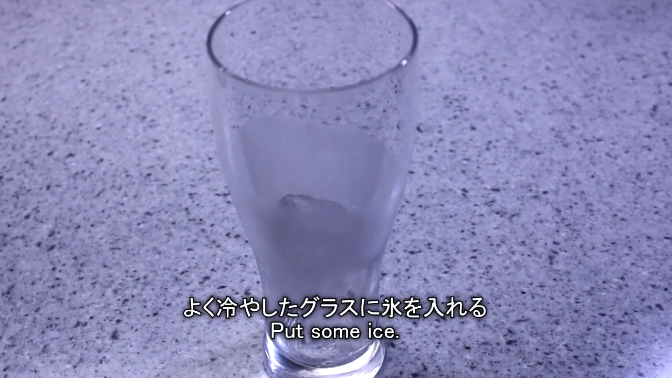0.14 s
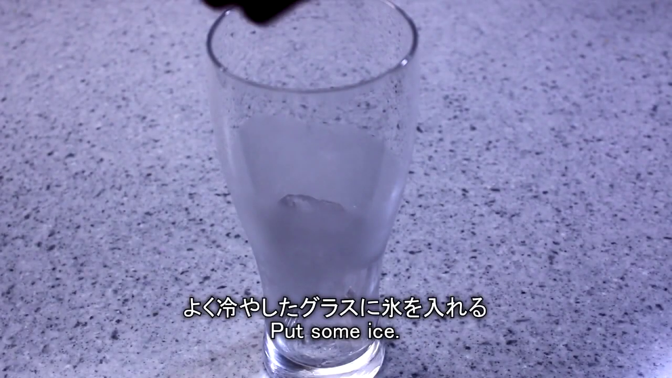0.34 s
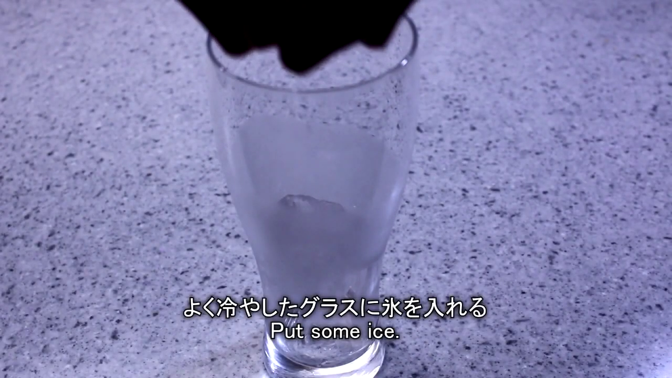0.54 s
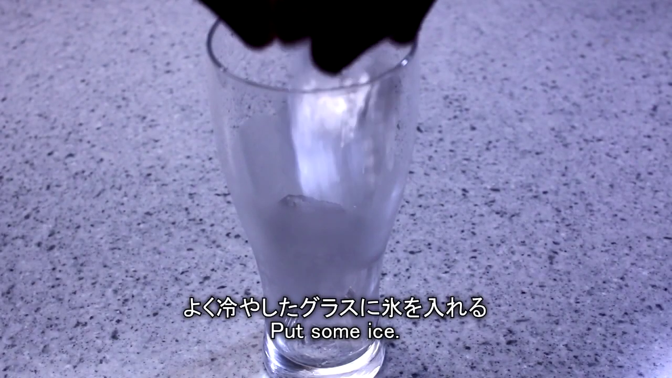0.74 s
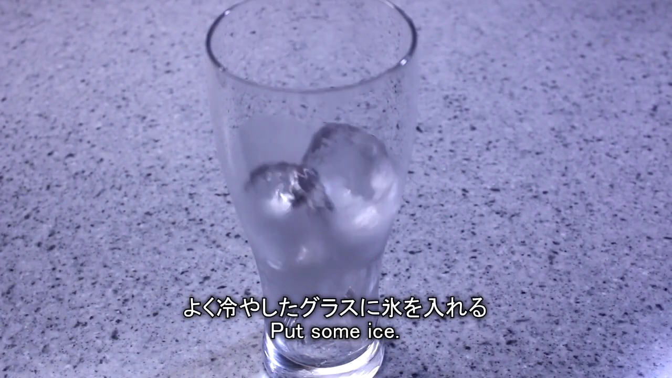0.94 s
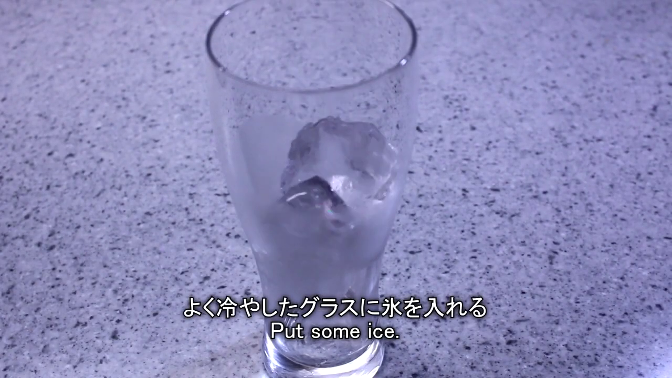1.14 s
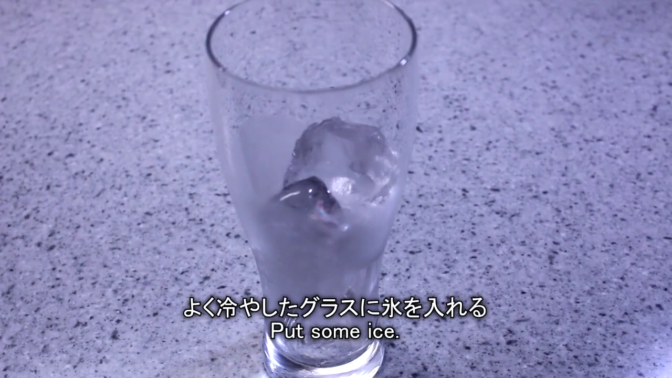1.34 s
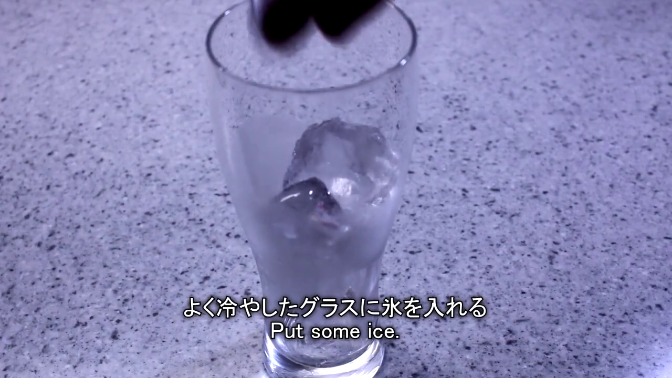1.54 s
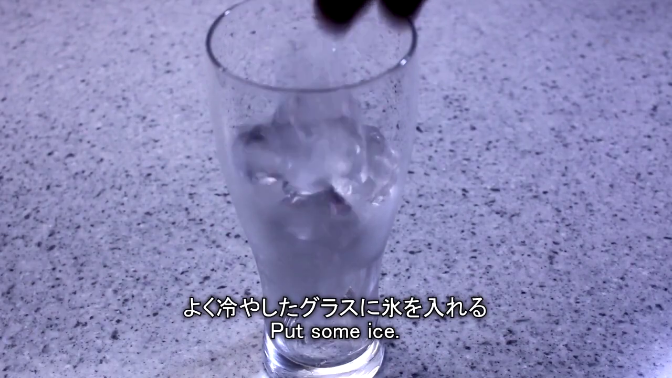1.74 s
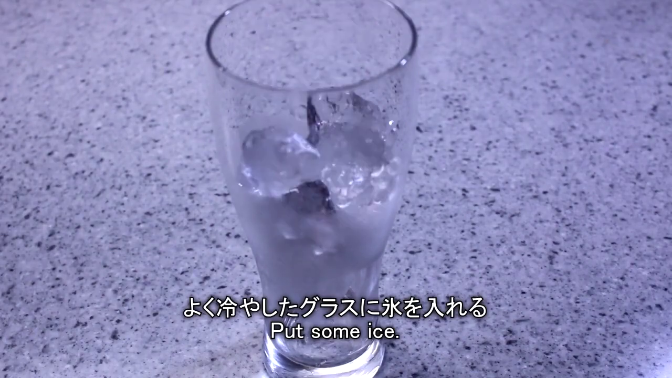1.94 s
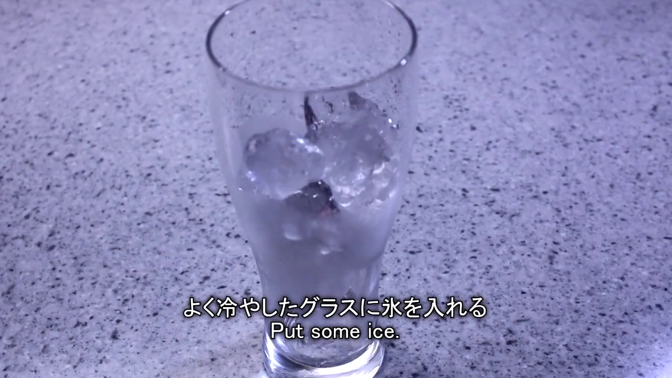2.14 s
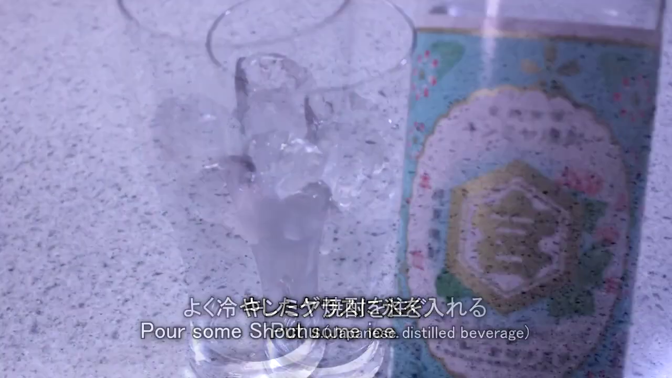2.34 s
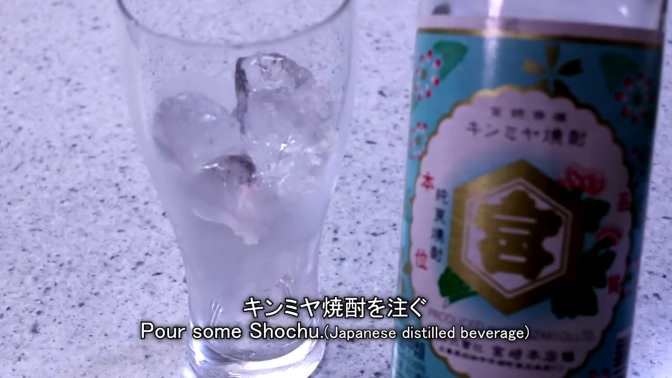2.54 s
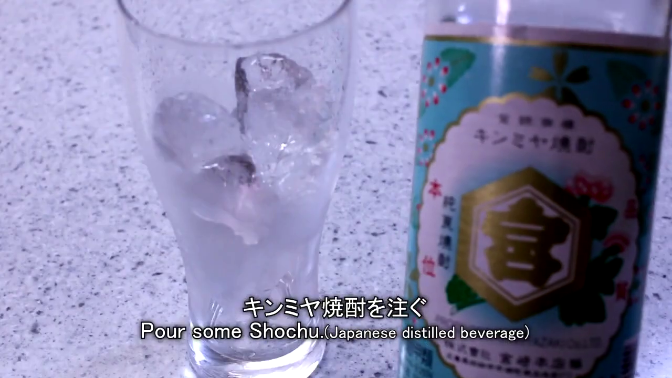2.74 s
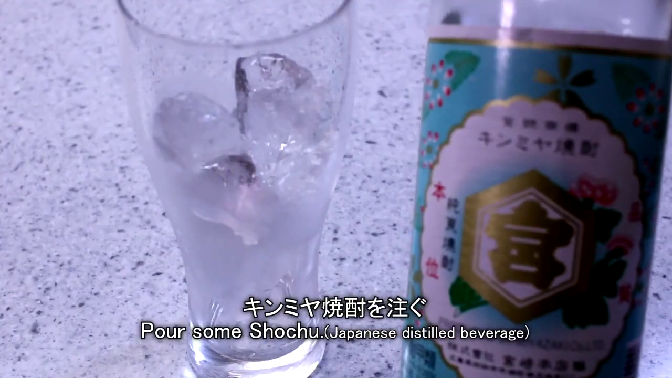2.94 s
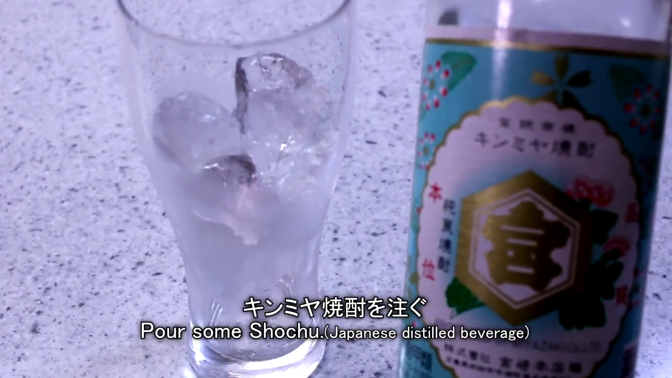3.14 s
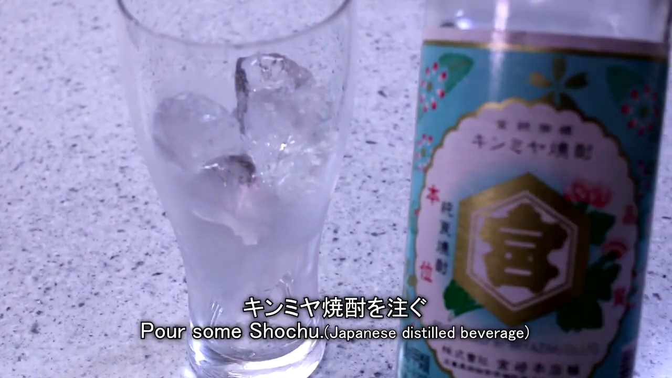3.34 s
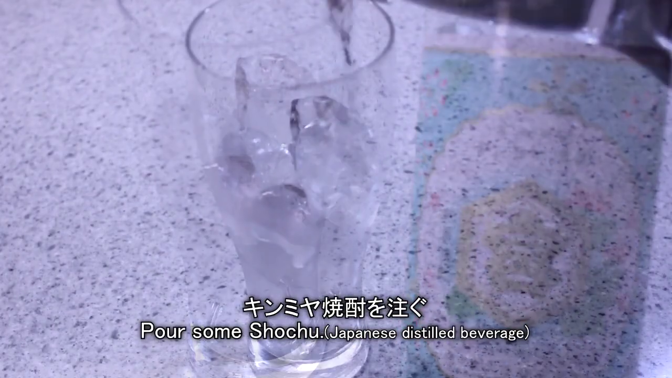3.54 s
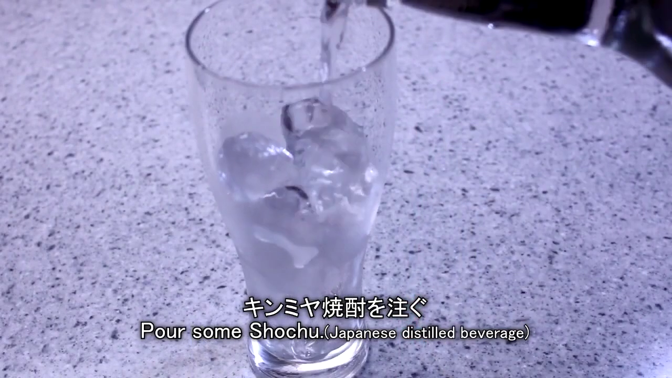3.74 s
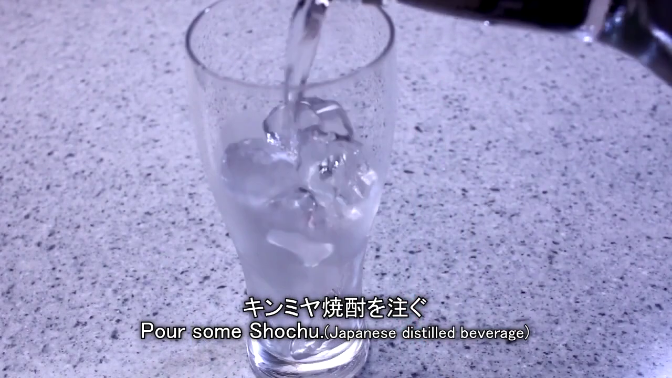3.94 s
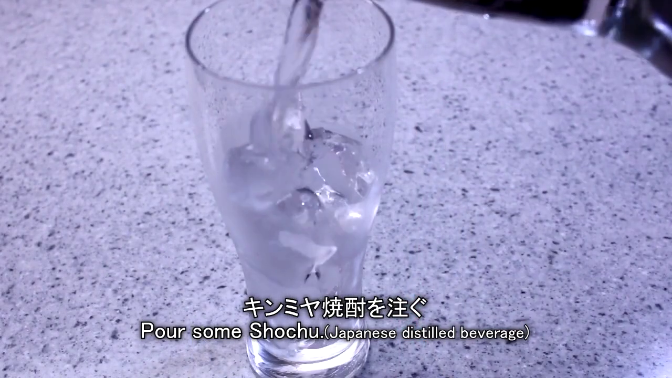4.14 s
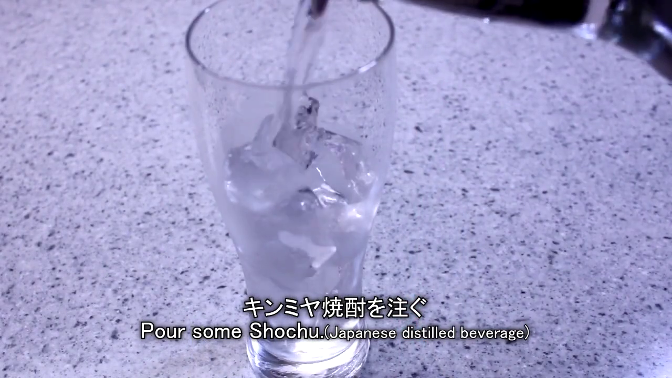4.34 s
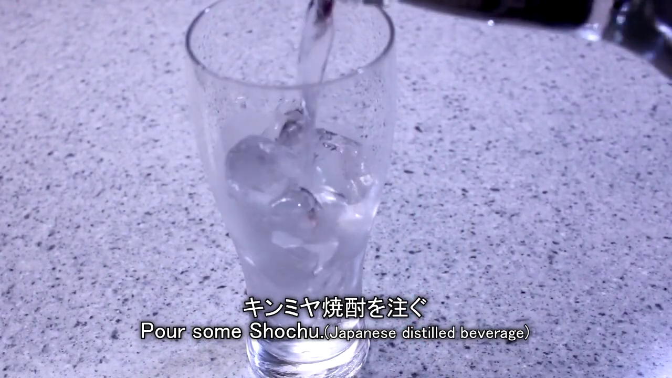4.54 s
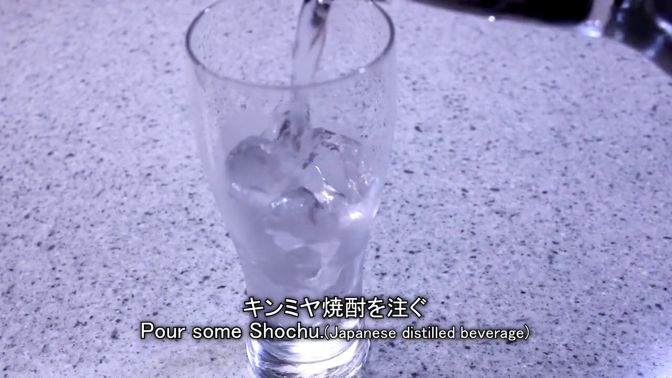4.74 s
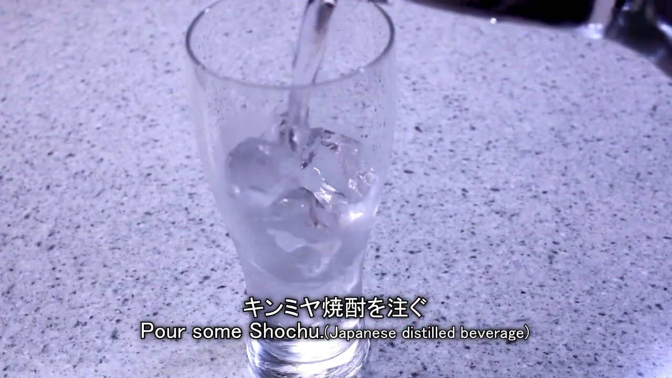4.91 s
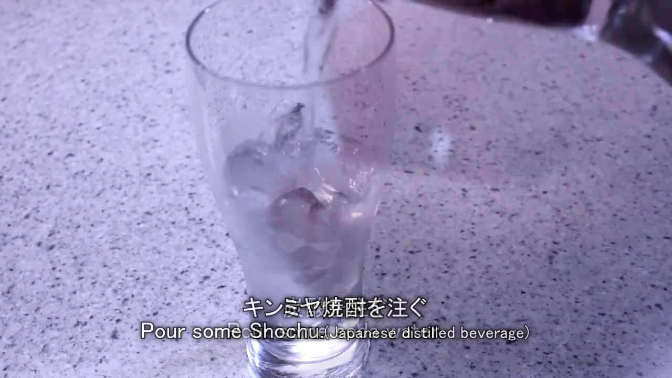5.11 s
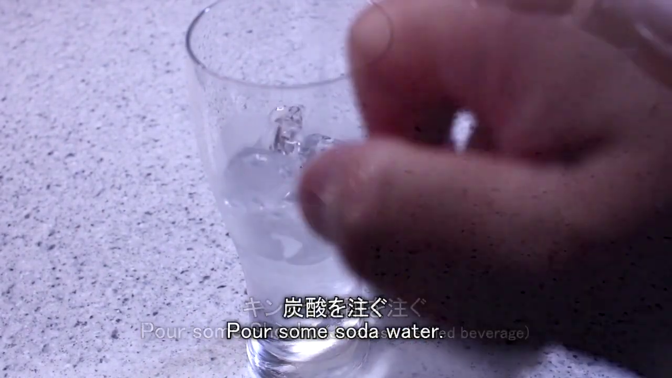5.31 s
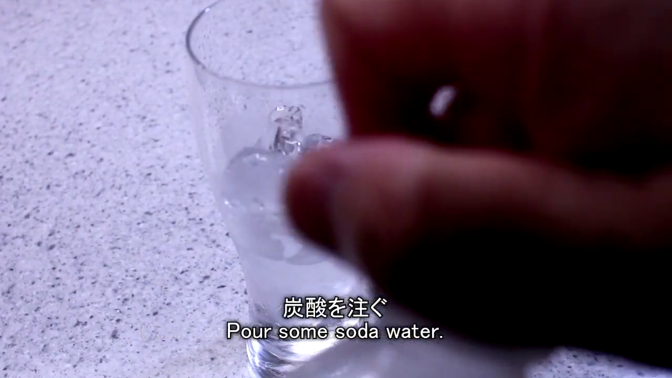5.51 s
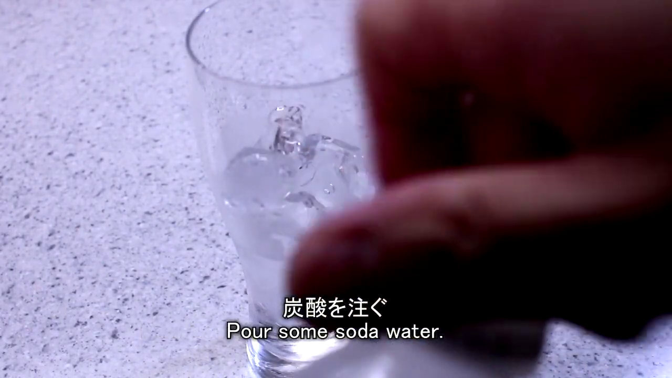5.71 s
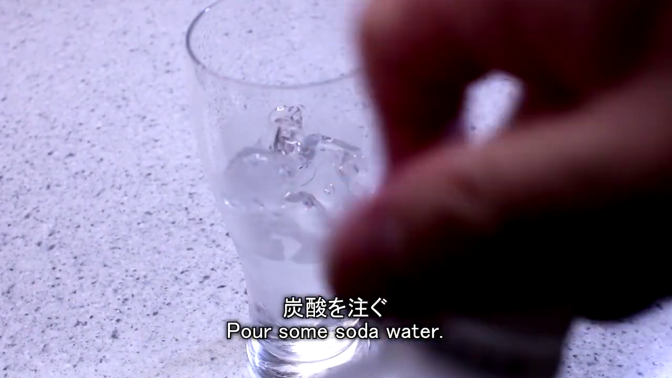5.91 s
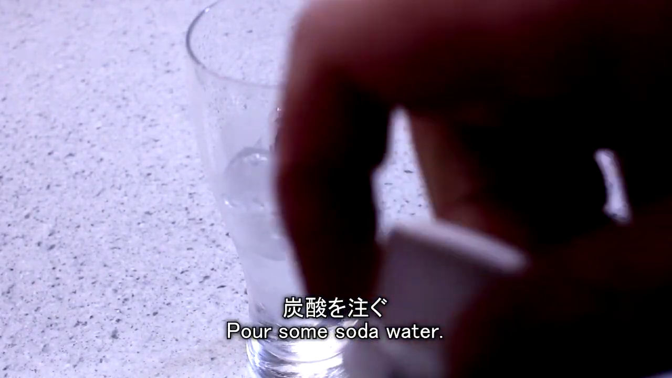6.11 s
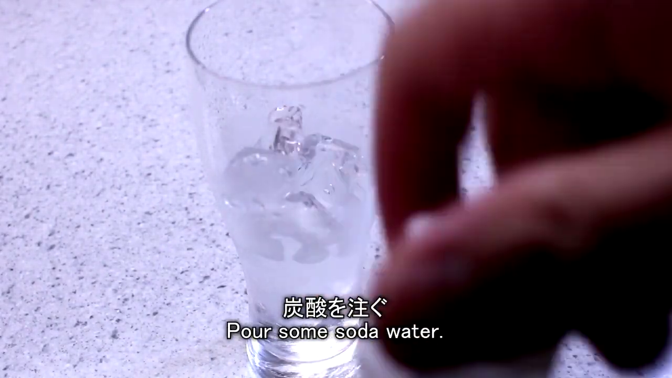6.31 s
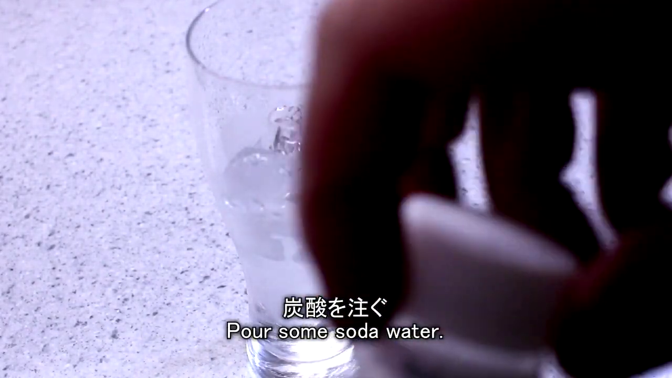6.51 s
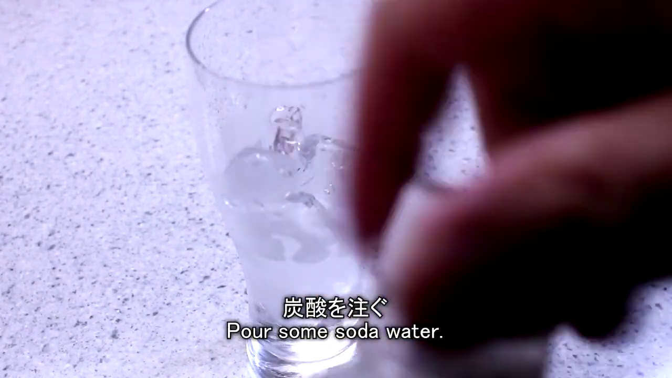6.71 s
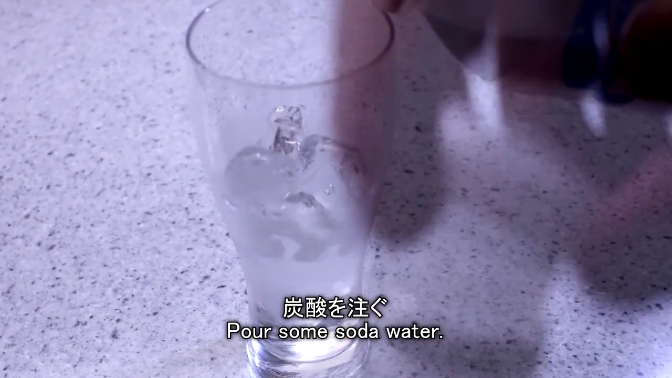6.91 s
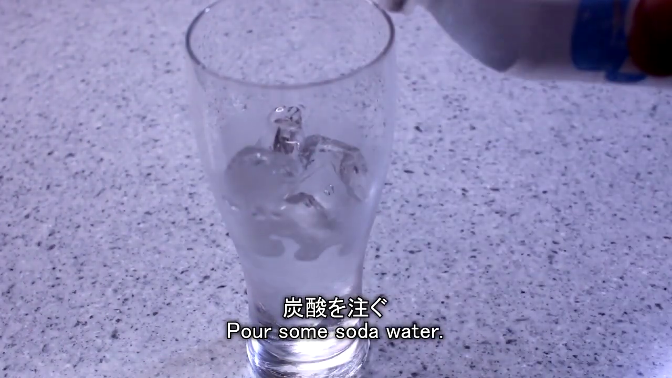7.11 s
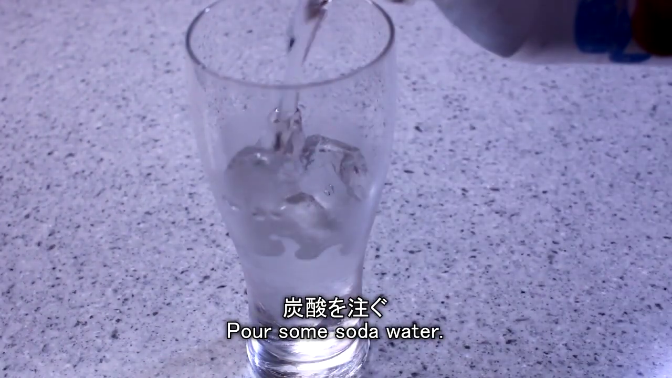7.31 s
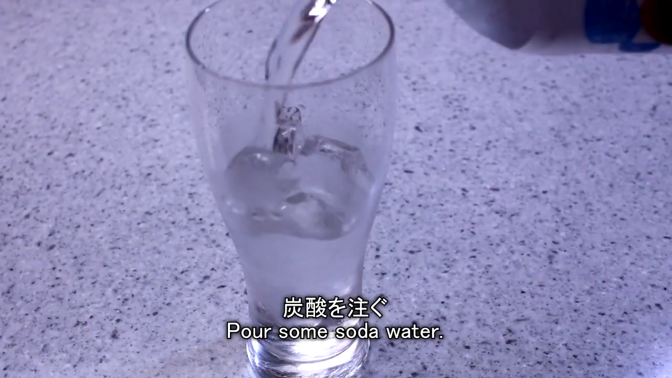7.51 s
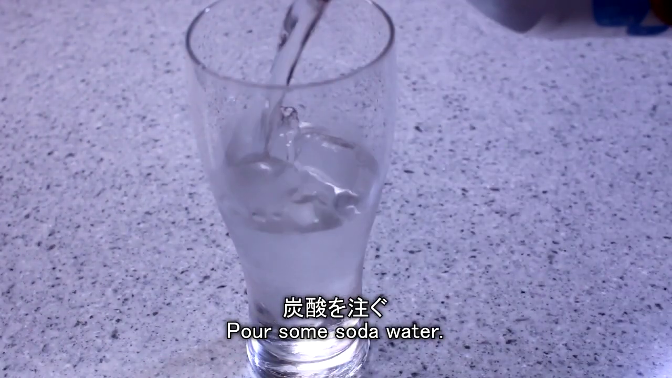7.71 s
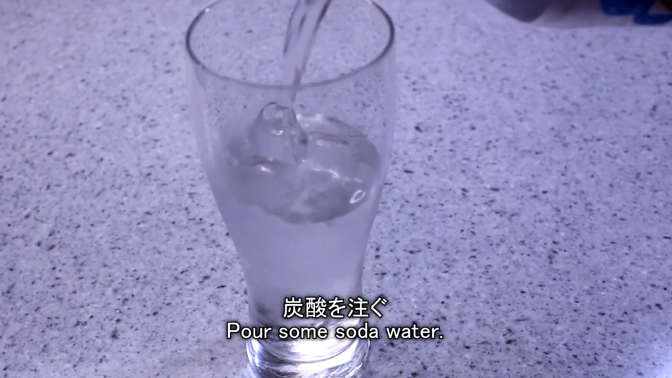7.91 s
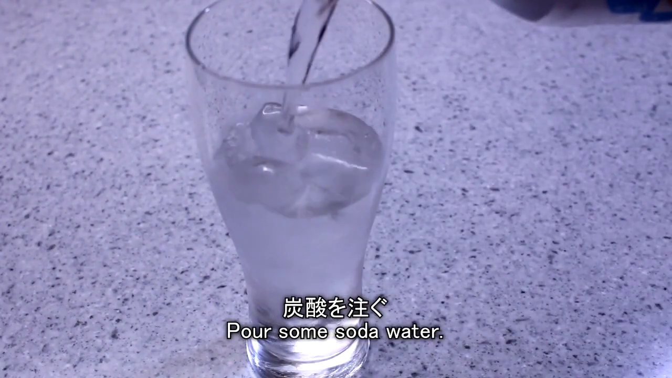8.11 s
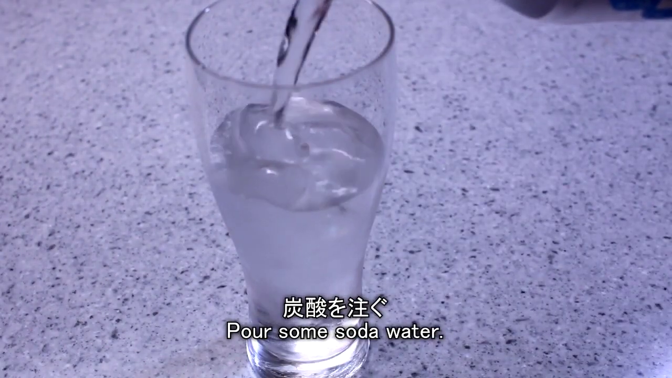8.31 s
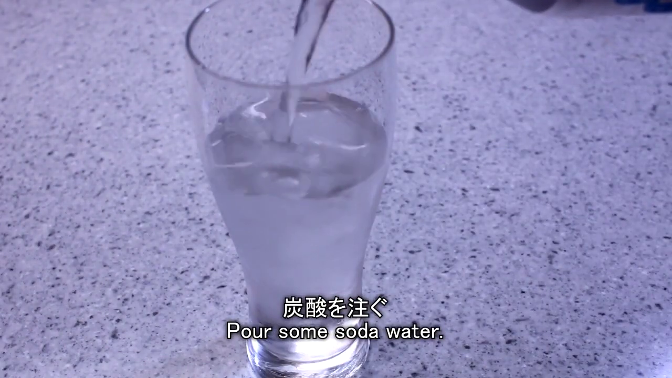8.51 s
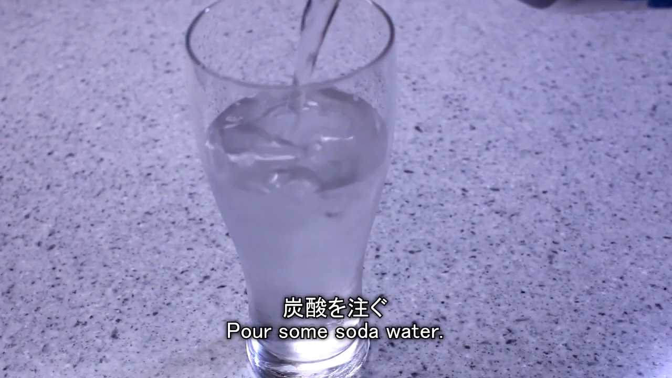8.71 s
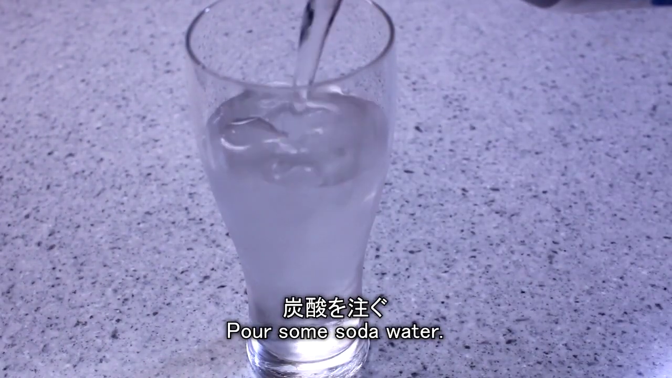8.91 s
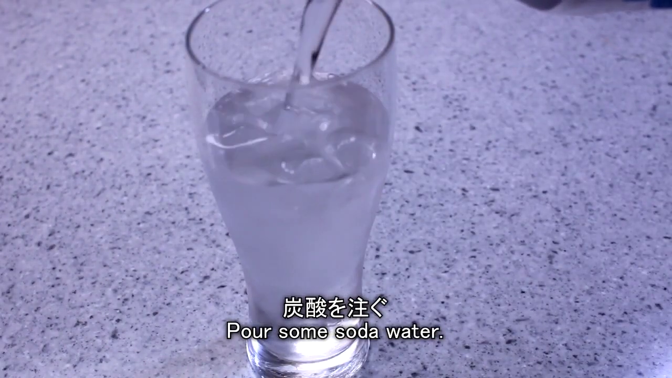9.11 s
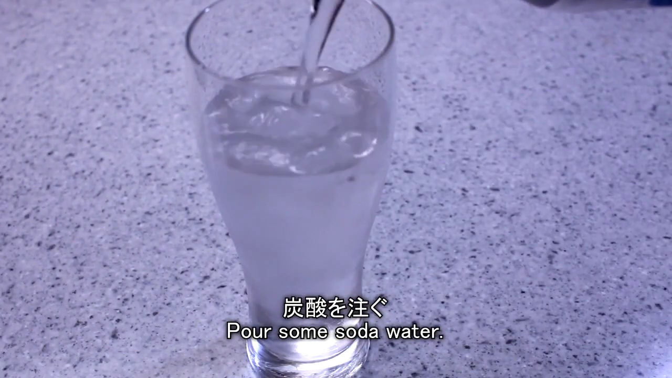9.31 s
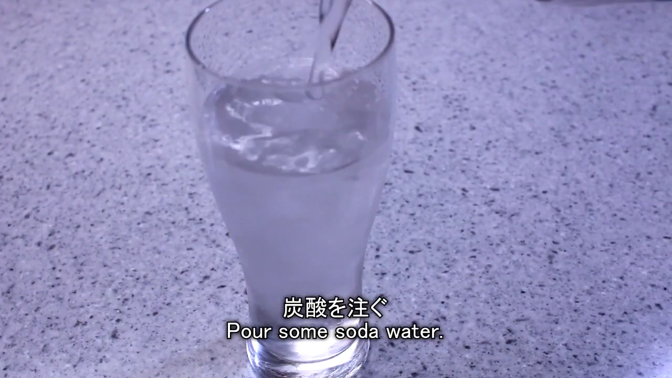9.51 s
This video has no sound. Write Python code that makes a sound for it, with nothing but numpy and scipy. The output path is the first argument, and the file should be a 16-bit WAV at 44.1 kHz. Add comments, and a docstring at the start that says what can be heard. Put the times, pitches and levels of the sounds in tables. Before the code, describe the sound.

A drink is made close to the microphone on a kitchen counter. Cubes rattle briefly, then hit an empty glass with loud bright clinks, each ring choked by the next cube. A stream of liquid splashes over them, glugging while ice shifts. A soda cap is twisted off with rough clicks and a short sharp hiss. Soda follows, its bubbles deepening as cubes tap softly, with short room reverberation.

```python
"""Ice cubes rattle, then drop into a tall dry glass whose wall modes ring in pairs and are choked by later cubes.
A spirit is poured, as chirping bubbles over grainy splash, and the cubes knock and shift as short resonant bursts.
A plastic cap is twisted off a soda bottle: resonant clicks, thread rub, rough spits and a burst of gas in shaped noise.
Soda fills the glass, the floating cubes tapping its wall.
A small hard-walled kitchen, a decaying noise tail, hums quietly behind in shaped noise."""
import sys
import numpy as np
from scipy import signal
from scipy.io import wavfile

SR = 44100
rng = np.random.default_rng(int(sys.argv[2]) if len(sys.argv) > 2 else 0)


def unload_wav(signal):
    """Save mono or channel-first audio to the path in sys.argv[1] as 16-bit WAV at rate SR, clipped to [-1, 1]."""
    wavfile.write(
        sys.argv[1],
        SR,
        np.round(np.clip(np.atleast_2d(signal).T, -1, 1) * 32767).astype(np.int16),
    )


def voltage_ratio(decibels):
    """Convert decibels (scalar or array-like) to amplitude ratios, 20 dB per decade."""
    exponent = np.asarray(decibels, float) / 20
    return 10 ** exponent


N = 421155   # length [samples]

# cubes hitting the dry glass, levels relative: (time [s], crack level [dB], first ring level [dB],
# second ring level [dB], upper rings level [dB], share of the older ringing that survives the contact)
CUBE_LANDINGS = [(.733, 4.5, -12, -11.5, -27, 1), (0.776, -15.5, -23, -31, -19, 0.2),
                 (0.785, 6.5, -23, -30, -16, 0.084), (.814, -1, -9.5, -6.5, -24, 0.05),
                 (.849, -11, -39.5, -38, -24, .6), (1.034, -33, -46, -50, -58, 0.45),
                 (1.103, -24, -58.5, -57, -70, 0.25), (1.707, -24, -19, -37, -24.5, 0.66),
                 (1.734, 6, -26, -34.5, -21, .5), (1.745, 4, -20.5, -27.5, -20.5, 0.17),
                 (1.864, -2, -23.5, -34, -22.5, 0.4), (1.956, -11, -27, -27.5, -45.5, 0.5),
                 (1.968, -9.5, -33, -39, -37, 0.5), (2.43, -24, -59, -69, -75, 0.89),
                 (2.439, -26, -64.5, -69, -77, 0.79), (2.45, -40, -66, -71.5, -81, .93)]
# modes of the glass: (pitch [Hz], level [dB], t60 [s], split up to the twin [Hz], waves round the rim)
GLASS_MODES = [(1434, 0, .45, 7.4, 2), (2945, 0, .5, 4.6, 3), (668, -4, .07, 40, 1), (1190, -8, .08, 30, 1),
               (2290, -14, .15, 30, 2), (3198, -8, .3, 10, 3), (3390, -8, .15, 30, 2),
               (4030, -18, .1, 60, 3), (5437, -4, .3, 45, 3), (5580, 0, .35, 60, 3), (5790, -6, .25, 40, 2),
               (6293, -10, .15, 50, 3), (7316, -7, .35, 60, 2), (7450, -4, .35, 50, 3),
               (7700, -10, .3, 60, 3), (9050, -12, .27, 90, 3), (10700, -12, .3, 90, 2),
               (12150, -15, .28, 90, 3), (13260, -19, .35, 60, 2)]
HALF_OCTAVE_EDGES_HZ = 25 * 2 ** np.arange(0, 9.6, .5)


def at_hz(points, hz):
    """A spectrum read on a log-frequency axis."""
    points = np.array(points, float)
    return np.interp(np.log(hz), np.log(np.maximum(points[:, 0], 1)), points[:, 1])


def rms_one(x):
    """Scaled to unit rms."""
    return x / np.sqrt(np.mean(x ** 2) + 1e-20)


def band(x, low_hz, high_hz):
    """Second-order band-pass."""
    return signal.sosfilt(signal.butter(2, [low_hz, min(high_hz, .45 * SR)], "band", fs=SR, output="sos"), x)


def ring(clicks, hz, t60):
    """A two-pole resonator: a unit click sets a sine of height 1 ringing."""
    r, w = voltage_ratio(-60 / (t60 * SR)), 2 * np.pi * hz / SR
    return signal.lfilter([0, np.sin(w)], [1, -2 * r * np.cos(w), r * r], clicks + 1e-18)


def add(out, s, sound):
    """Lay a sound into out from time s."""
    i = max(round(s * SR), 0)
    out[..., i:i + sound.shape[-1]] += sound[..., :N - i]


def ramp_db(start, stop, rise, fall):
    """0 dB from start to stop, sloping away before and after (dB per s)."""
    s = np.arange(N) / SR
    return np.minimum(0, np.minimum(rise * (s - start), fall * (stop - s)))


def shaped_noise(level_db, alike, start, stop):
    """Half-octave bands of stereo noise; level_db(hz) is the level over time, alike(hz) the left-right likeness."""
    a, b = round(start * SR), min(round(stop * SR), N)
    out = np.zeros((2, N))
    white = rng.standard_normal((2, 2, b - a), dtype=np.float32)
    for k, (low, high) in enumerate(zip(HALF_OCTAVE_EDGES_HZ, HALF_OCTAVE_EDGES_HZ[1:])):
        mid, side = band(white[k % 2], low, high)   # neighbouring bands use different noise
        hz = np.sqrt(low * high)
        c = np.clip(alike(hz), -1, 1)
        gain = voltage_ratio(level_db(hz)[a:b])
        out[:, a:b] += gain * (np.sqrt(1 + c) * mid + np.sqrt(1 - c) * side * [[1], [-1]])
    return out


def scattered(start, stop, per_s, db, low_hz, high_hz):
    """Rows of small knocks at random times, strengths round db and pitches."""
    when, octave, keep, size = rng.random((100, 4)).T
    times = start + when * (stop - start)
    levels = db - 3 * np.log(-np.log(size + 1e-9) + .1)   # a few are much louder
    pitches = low_hz * (high_hz / low_hz) ** octave
    rows = np.c_[times, levels, pitches]
    return list(rows[keep * 100 < per_s * (stop - start)])


def knocks(rows, body, body_db, own_db, thud_db, snap_db, smear_db, t60, snap_t60):
    """Each knock: a short ring and a ragged burst round its own pitch, the body, a low thud, a bright snap."""
    out, thuds, snaps = np.zeros((3, N)) + 1e-12
    t = np.arange(SR // 9) / SR
    for s, db, hz in rows:
        noise = rng.standard_normal((3, len(t)))
        spread = rng.normal(0, 4, len(body))   # each knock excites the body differently [dB]
        blow = noise[0] * voltage_ratio(-60 * t / 0.012) / 3   # a ragged contact of a few ms
        blow[0] = 1.3   # after one clean edge
        sound = voltage_ratio(own_db) * ring(blow, hz, t60)
        for (peak_hz, width, peak_db), extra_db in zip(body, spread):
            sound += voltage_ratio(body_db + peak_db + extra_db) * ring(blow, peak_hz, 5.2 / width)
        # sharp edge, then a smear, more after hard knocks
        edge = voltage_ratio(-60 * t / 0.0063)
        fall = edge + voltage_ratio(smear_db + 0.13 * (db + 15) - 60 * t / snap_t60)
        burst = band(band(noise[0], .6 * hz, 1.7 * hz), .5 * hz, 2 * hz)
        sound += voltage_ratio(8.0) * burst * fall
        sound *= voltage_ratio(db) / np.abs(sound).max()
        # high knocks come from small contacts: less thud, more snap
        octaves = np.log2(hz / 2000)
        add(thuds, s, voltage_ratio(db + thud_db - 1.5 * octaves - 60 * t / 0.054) * noise[1])
        hardness_db = 0.88 * (db + 21.0)   # harder knocks are brighter
        add(snaps, s, voltage_ratio(db + snap_db + octaves + hardness_db) * noise[2] * fall)
        add(out, s, sound)
    return band(out + band(thuds, 150, 960) + band(snaps, 5500, 10000), 180, 16000)


def background():
    """Rumble, appliance hum and microphone hiss: steady shaped noise, swelling together."""
    # spectrum before the offsets below: (pitch [Hz], relative level [dB])
    quiet = [(15, -40), (25, -17.5), (65, -1.5), (118, -5.5), (214, 1.5), (273, -1), (509, -7.5), (765, -7),
             (1000, -9), (1390, -17), (1640, -16), (1820, -17.5), (14000, -31), (15200, -38.5)]
    # how alike the two sides are: (pitch [Hz], left-right likeness)
    likeness = [(60, 1), (130, 0.55), (290, 1), (640, -0.18), (1410, 0.59), (3100, -0.24), (6820, 0.085),
                (15000, 0.17)]
    # the background is fuller: (from [s], to [s])
    swells = [(2.28, 3.55), (6.82, 9.9)]
    s = np.arange(N) / SR
    fade_s = 0.099
    swell = sum(np.clip(np.minimum(s - a, b - s) / fade_s + .5, 0, 1) for a, b in swells)

    def level(hz):
        if hz < 95:
            offset_db = -45 + 9 * swell   # rumble
        elif hz < 1200:
            offset_db = -39.5 + 3.5 * swell   # hum
        else:
            offset_db = -35 + 1.5 * swell   # hiss
        return at_hz(quiet, hz) + offset_db

    return shaped_noise(level, lambda hz: at_hz(likeness, hz), 0, N / SR)


def ice_rattle():
    """Loose cubes rattle: loud knocks with small random ones between, exciting the tray's resonances."""
    # loud knocks: (time [s], level [dB], main pitch [Hz])
    loud_knocks = [(.026, -47, 4000), (.033, -26, 2220), (.043, -26, 1440), (.056, -29, 2270),
                   (.066, -22, 1080), (.077, -32, 4100), (.091, -23, 4150), (.128, -32, 4600),
                   (.130, -38, 6900), (.149, -17.5, 4000), (.189, -27, 3950), (.251, -36, 2470)]
    # tray resonances, t60 being 5.2 / width: (pitch [Hz], width [Hz], relative level [dB])
    tray = [(2400, 270, -5.5), (4110, 430, 5.5), (4320, 230, -5)]
    small = scattered(.028, .22, per_s=200, db=-36, low_hz=900, high_hz=4500)
    return knocks(loud_knocks + small, tray, body_db=-4.5, own_db=-10, thud_db=-40, snap_db=-48.5,
                  smear_db=-4.5, t60=0.045, snap_t60=0.14)


def drops():
    """Each cube cracks, thuds and rings twin modes of the wall; later contacts choke the older ringing."""
    # phase by which the left leads the right, lower twin: (pitch [Hz], lead [rad])
    lower_lead = [(600, -1.5), (1440, 1.2), (2940, .6), (4000, .6)]
    # the same for the upper twin, which radiates elsewhere: (pitch [Hz], lead [rad])
    upper_lead = [(600, -1.4), (1440, 1.7), (2940, -.8), (4000, .7)]
    fuller_s = 1.6   # from here more ice lies against the wall
    landing_rad = (1.83, -.33)   # landing place to the twins' axis on the rim, before and after fuller_s
    out, t = np.zeros((2, N)), np.arange(SR * 3 // 5) / SR
    hz, mode_db, t60, split, waves = np.transpose(GLASS_MODES)[:, :, None]
    waves = np.round(waves)
    sides = np.array([1, -1])[:, None, None] / 2
    decay = voltage_ratio(mode_db - 60 * t / t60)
    lower = decay * np.sin(2 * np.pi * hz * t + at_hz(lower_lead, hz) * sides)
    upper = decay * np.sin(2 * np.pi * (hz + split) * t + at_hz(upper_lead, hz) * sides)
    # the landing place sets how strongly each twin is struck
    twins = [np.cos(waves * angle) * lower + np.sin(waves * angle) * upper for angle in landing_rad]
    short = t[:SR // 3]
    for s, db, ring_db, second_db, upper_db, _ in CUBE_LANDINGS:
        level = voltage_ratio(at_hz([(1434, ring_db), (2945, second_db), (5000, upper_db - 10)], hz[:, 0]))
        choke = np.ones(len(t))
        for later, *_, survives in CUBE_LANDINGS:
            if later > s:
                choke = choke * np.where(t > later - s, np.clip(survives, 0, 1), 1)
        modes = twins[int(s > fuller_s)]
        # the second ring is choked less
        rings = choke * (level @ modes) + (choke ** .55 - choke) * level[1] * modes[:, 1]
        add(out, s, np.minimum(t * 2000, 1) * rings)   # 0.5 ms onset
        noise = rng.standard_normal((2, SR // 3))
        top_hz = 6500 * 2 ** (.02 * db)   # softer landings are duller
        bright = band(band(noise[0], 2800, top_hz), 300, 11000)
        crack = voltage_ratio(5.5) * band(noise[0], 600, 1300) + bright
        crack = crack * (voltage_ratio(-3.5 - 60 * short / 0.059) + voltage_ratio(6.5 - 60 * short / 0.0068))
        # the base on the counter
        thud = band(band(noise[1] * voltage_ratio(-60 * short / 0.37), 160, 390), 140, 1200)
        thud_db = 0.38 * db + (-11.5 if s < fuller_s else -19)
        add(out, s, voltage_ratio(db - 10.5) * crack + voltage_ratio(thud_db) * thud)
    return out


def clatter():
    """After each landing the cubes go on chattering against the wall: dense small contacts in its blurred modes."""
    strength = np.zeros(3 * SR)
    for s, *_, upper_db, _ in CUBE_LANDINGS:
        strength[round(s * SR)] = voltage_ratio(upper_db)
    # a strong quick decay over a weak slow one
    dying = sum(voltage_ratio(db) * signal.lfilter([1], [1, -voltage_ratio(-60 / (t60 * SR))], strength)
                for db, t60 in [(8.5, 0.035), (-8.5, 0.48)])
    clumps = rms_one(band(rng.standard_normal(len(dying)), 32, 260))
    contacts = dying * rng.standard_normal(len(dying)) * voltage_ratio(1.5 * clumps)
    blurred = sum(voltage_ratio(db) * ring(contacts, hz, 0.03) for hz, db, *_ in GLASS_MODES[2:])
    chatter = voltage_ratio(-24.5) * blurred + voltage_ratio(-3.0) * band(contacts, 330, 3700)
    return np.pad(chatter, (0, N - len(dying)))


def ice_ticks():
    """The ice ticks as it warms, ringing its own high resonances."""
    # ticks: (time [s], level [dB], main pitch [Hz])
    ticks = [(1.446, -36.5, 4400), (2.368, -44.5, 4399.5)]
    # ice resonances, t60 being 5.2 / width: (pitch [Hz], width [Hz], relative level [dB])
    ice = [(2900, 200, -1), (6100, 200, -1), (7800, 200, 0), (9700, 250, -3.5)]
    return knocks(ticks, ice, body_db=-1.5, own_db=1.5, thud_db=-38, snap_db=-30,
                  smear_db=-11, t60=.03, snap_t60=.03)


def wet_knocks():
    """Wet cubes knock and shift in the glass, exciting the resonances of glass and ice together."""
    # loud knocks: (time [s], level [dB], main pitch [Hz])
    loud_knocks = [(3.361, -38, 623), (3.39, -41.5, 5680), (3.572, -35.5, 1700), (3.636, -21.5, 2900),
                   (3.648, -28, 2650), (3.736, -31.5, 1440), (3.752, -16.5, 1260), (3.754, -22.5, 2050),
                   (3.768, -34, 3000), (3.775, -20, 344), (3.81, -46, 650), (3.852, -27, 670),
                   (3.87, -22.5, 350), (3.93, -30.5, 396), (3.886, -26.5, 4800), (3.9, -24.5, 1320),
                   (3.914, -22, 1400), (3.937, -29, 1490), (3.99, -29, 6000), (4.012, -24, 2040),
                   (4.066, -30, 1450), (4.078, -20, 1990), (4.09, -19, 2900), (4.105, -17.5, 1300),
                   (4.118, -9.5, 1486), (4.121, -10, 3000), (4.123, -9.5, 7250), (4.318, -13, 3320),
                   (4.361, -24, 1450), (4.447, -21, 1860), (4.464, -20, 2200), (4.488, -17, 1310),
                   (4.509, -13, 840), (4.535, -30, 336), (4.616, -30, 3820), (4.645, -32, 4540),
                   (4.63, -43, 5370), (4.686, -38, 750), (4.722, -35, 1530), (4.79, -34.5, 5600),
                   (4.8, -33, 950), (4.838, -34, 5700), (4.855, -46, 1510), (4.866, -31, 3720),
                   (4.877, -34.5, 1080), (4.901, -37, 2470), (4.91, -38, 1250), (4.989, -24.5, 4490),
                   (5.028, -29.5, 5700), (5.092, -34.5, 640), (5.118, -34.5, 3000), (5.165, -36, 950),
                   (5.178, -33.5, 2630), (5.225, -36, 1610), (5.321, -29.5, 2700), (5.338, -32, 3700),
                   (7.317, -32, 5140), (7.379, -37, 3030), (7.407, -34.5, 2330), (7.543, -31, 2790),
                   (7.689, -31.5, 3000), (7.78, -38, 2900), (7.835, -35, 2050), (7.897, -34.5, 5430),
                   (8.025, -33, 1060), (8.07, -42.5, 3680)]
    # iced glass resonances, t60 being 5.2 / width: (pitch [Hz], width [Hz], relative level [dB])
    iced_glass = [(1607, 330, 15.8), (3030, 150, 10.5), (3860, 116, 3.4), (5610, 260, 1.4)]
    small = scattered(3.8, 5.35, per_s=24, db=-43, low_hz=600, high_hz=5700)
    return knocks(loud_knocks + small, iced_glass, body_db=-20, own_db=5, thud_db=-6, snap_db=-27.5,
                  smear_db=1, t60=0.027, snap_t60=.09)


def bubbles(start, stop, middle_hz, surge_db):
    """Bubbles are born in bunches; each rings and rises in pitch as it nears the surface."""
    out = np.zeros(N)
    bunches = rng.uniform(start - .1, min(stop, N / SR), 180)
    candidates = np.c_[np.repeat(bunches, repeats=5), rng.random((900, 5))]
    for bunch, lag, chance, size, octaves, rise in candidates:
        born = min(bunch + 0.06 * lag ** 2, N / SR)
        i = min(round(born * SR), N - 1)
        if chance < 200 / 450 * voltage_ratio(0.4 * surge_db[i]):   # a surge makes more bubbles
            hz = middle_hz[i] * 2 ** (3 * (octaves - .5))
            cycles = np.arange(int(60 * SR / hz)) * hz / SR
            tone = np.sin(2 * np.pi * (cycles + .003 * rise * cycles ** 2))
            add(out, born, voltage_ratio(-22 * size) * tone * voltage_ratio(-cycles))   # dies by 1 dB per cycle
    return out


def pouring():
    """Bubbles over a grainy splash, a wet wall and a hollow of air; all follow the stream and its surges."""
    # streams: (start [s], stop [s], steady splash level [dB], drift [dB/s],
    # middle bubble pitch at the start [Hz], at the stop [Hz])
    pours = [(3.597, 5.354, -56.5, 0.5, 2030, 2170), (7.302, 9.713, -60, -3, 3800, 1200)]
    # air above the liquid, one row a stream: (low [Hz], high [Hz], level at the start [dB], at the stop [dB])
    cavity = [(278, 740, -58.5, -84.5), (876, 1440, -62, -51.5)]
    # the bottle glugs: (time [s], level over steady [dB])
    surges = [(3.9, 3.5), (4.153, 10.5), (4.498, 12), (4.72, 2.5), (4.87, 4), (5.03, 4), (5.2, 3),
              (7.751, 7), (8.42, 10.5)]
    # colour of the droplets: (pitch [Hz], relative level [dB])
    splash = [(180, -38), (300, -0.5), (486, -27), (603, -13.5), (1510, -2.5), (2000, -6), (4370, 0.5),
              (16000, -2.5)]
    # glass wall under the stream: (pitch [Hz], t60 [s], relative level [dB])
    wet_wall = [(950, 0.046, -5.5), (1486, 0.071, 4), (3000, 0.12, 1), (3780, 0.056, 6.5),
                (5530, 0.032, -7)]
    droplet_hz = 280 * 2 ** np.arange(0, 6, .2)
    rise_s, fall_s, edge_db_per_s = 0.16, 0.2, 115
    s = np.arange(N) / SR
    surge_db = np.max([np.interp(s, [at - rise_s, at, at + fall_s], [0, db, 0]) for at, db in surges], axis=0)
    out = np.zeros(N)
    for pour, air, wall_db in zip(pours, cavity, (-2, -12)):   # wall against splash [dB]
        start, stop, db, drift, first_hz, last_hz = pour
        low_hz, high_hz, first_db, last_db = air
        span = slice(round((start - .15) * SR), min(round((stop + .2) * SR), N))
        size = len(s[span])
        sizes = voltage_ratio(6.0 * np.minimum(rng.exponential(1, size), 4)) * rng.choice([-1, 1], size)
        clumps = rms_one(band(rng.standard_normal(size), 8.4, 40))   # the stream breaks up unevenly
        grains = sizes * (rng.random(size) < 1500 / SR) * voltage_ratio(6.5 * clumps)   # about 1500 per s
        # every droplet pitch gets the grains at its own moments
        spray = np.zeros(size)
        for a, b in zip(droplet_hz, droplet_hz[1:]):
            hz = np.sqrt(a * b)
            moved = np.roll(grains, rng.integers(-2000, 2000))
            spray += voltage_ratio(at_hz(splash, hz)) * ring(moved, hz, 36 / a) * np.sqrt(a)   # about 36 cycles long
        # a surge makes larger, lower bubbles
        middle_hz = np.interp(s, [start, stop], [first_hz, last_hz]) * 2 ** (-0.04 * surge_db)
        wall = sum(voltage_ratio(mode_db) * ring(grains, hz, t60) for hz, t60, mode_db in wet_wall)
        water = voltage_ratio(14) * bubbles(start, stop, middle_hz, surge_db)[span] + rms_one(spray)
        water += voltage_ratio(wall_db) * rms_one(wall)
        hollow = rms_one(band(band(grains, low_hz, high_hz), low_hz, high_hz))
        motion_db = surge_db + ramp_db(start, stop, edge_db_per_s, edge_db_per_s)
        flow_db = db + drift * (s - start) + motion_db
        hollow_db = np.interp(s, [start, stop], [first_db, last_db]) + motion_db
        out[span] += voltage_ratio(flow_db[span]) * water + voltage_ratio(hollow_db[span]) * hollow
    return out


def cap_and_spits():
    """The cap clicks, and three rough spits as the gas breaks out: short bursts with the bottle neck's resonances."""
    # cap clicks, and the spits at 5.932, 5.945 and 5.957 s: (time [s], level [dB], main pitch [Hz])
    bursts = [(5.707, -24, 2200), (5.932, -17, 3000), (5.945, -13, 3000), (5.957, -12.5, 3300),
              (6.145, -13, 3100), (6.151, -20, 800), (6.181, -15, 3140), (6.191, -16.5, 3400),
              (6.348, -18.5, 3900), (6.381, -16.5, 9660), (6.388, -23.5, 3420), (6.437, -33, 3000),
              (6.45, -30, 3520), (6.535, -36.5, 3360), (6.565, -40, 3306), (6.588, -12, 3650),
              (6.598, -18, 3700), (6.75, -21, 3900), (6.761, -18.5, 3980), (6.771, -29, 4500),
              (6.783, -23.5, 2500), (6.833, -29.5, 1290), (6.876, -16, 3800), (6.908, -36.5, 3480),
              (6.933, -31.5, 3096), (6.947, -31, 3065)]
    # neck resonances, t60 being 5.2 / width: (pitch [Hz], width [Hz], relative level [dB])
    bottle_neck = [(1900, 220, -4), (3100, 450, -1.5), (3707, 1100, 12.5), (7300, 760, -8.5)]
    return knocks(bursts, bottle_neck, body_db=-6, own_db=-10, thud_db=-9, snap_db=-15,
                  smear_db=-5, t60=0.022, snap_t60=0.018)


def gas():
    """Bright noise jet from under the cap and a leak that outlasts it; thread rubs and a cap knock's tail around them."""
    # spectrum before the offsets below: (pitch [Hz], relative level [dB])
    jet_colour = [(180, -57), (300, -27), (937, -27.5), (1070, -26), (1460, -24), (2690, -16.5),
                  (3750, -18), (8010, 10.5), (15500, -2)]
    # cap thread rubbing, and the short tail of a cap knock at 6.592 s: (time [s], length [s], relative level [dB])
    rubs_and_tail = [(5.713, .004, -41), (5.744, 0.0094, -40), (5.801, 0.013, -46), (6.385, 0.094, -41),
                     (6.592, 0.011, -23), (6.751, 0.029, -36), (6.819, 0.02, -38.5), (6.93, 0.0093, -42)]
    seal_s, rise_s, hold_s = 5.935, 0.025, 0.11   # the seal breaks
    leak_end_s, leak_db, onset_db_per_s = 6.157, -29.5, 2303
    since = np.arange(N) / SR - seal_s
    burst_db = ramp_db(seal_s, seal_s + hold_s, onset_db_per_s, 900.5)
    swell_db = -7.5 * np.clip(1 - since / rise_s, 0, 1)
    high = voltage_ratio(-9 + burst_db + swell_db - 20 * since)
    high += voltage_ratio(leak_db + ramp_db(seal_s, leak_end_s, onset_db_per_s, 152.5))
    # the jet's lower part drains sooner
    low = voltage_ratio(-15.5 + burst_db - 116.5 * np.maximum(since - rise_s, 0))
    low += voltage_ratio(leak_db - 6.5 + ramp_db(seal_s, leak_end_s, onset_db_per_s, 329))
    for s, length, db in rubs_and_tail:
        shape_db = ramp_db(s, s + length, 901, 801)
        low += voltage_ratio(db + shape_db)
        high += voltage_ratio(-50 + 0.2 * (db + 36.0) + shape_db)   # the hiss varies less than the low part
    # the gap is wet and uneven
    sputter_db = [[1.5], [3.5]] * rms_one(band(rng.standard_normal((2, N)), 30, 400))
    high_db, low_db = 20 * np.log10(np.array([high, low]) + 1e-6) + sputter_db

    def level(hz):
        return at_hz(jet_colour, hz) + (high_db - 5.0 if hz > 4800 else low_db + 13.5)

    return shaped_noise(level, lambda hz: .995, 5.6, 7.05)


def float_taps():
    """Floating cubes tap the wall of the full glass, with small random taps between."""
    # loud taps: (time [s], level [dB], main pitch [Hz])
    loud_taps = [(8.295, -27.5, 1260), (8.296, -22.5, 2100), (8.382, -28, 3300), (8.384, -28, 1330),
                 (8.405, -19.5, 1223), (8.456, -20.5, 1387), (8.48, -23, 1055), (8.412, -24.5, 3250),
                 (8.586, -34.5, 3250), (8.658, -28.5, 1630), (8.718, -30, 1495), (8.777, -28.5, 1260),
                 (8.855, -19, 1545), (8.86, -36.5, 3250), (8.916, -21.5, 1552), (8.969, -34, 1580),
                 (8.978, -31.5, 1440), (9.015, -33, 1370), (9.049, -20.5, 1400), (9.144, -28.5, 1098),
                 (9.17, -42, 3350), (9.231, -29, 1005), (9.33, -32, 1150), (9.377, -28.5, 1080)]
    # full glass resonances, t60 being 5.2 / width: (pitch [Hz], width [Hz], relative level [dB])
    full_glass = [(1050, 90, 5), (1290, 110, 6), (1678, 190, 9), (2050, 150, 0), (3250, 80, -13)]
    small = scattered(8.3, 9.5, per_s=40, db=-41, low_hz=950, high_hz=2000)
    return knocks(loud_taps + small, full_glass, body_db=-12, own_db=3, thud_db=-36, snap_db=-46,
                  smear_db=-9, t60=0.03, snap_t60=0.15)


def room(x):
    """Diffuse tail: noise dying band by band, partly shared by the two sides."""
    # decay of the kitchen: (pitch [Hz], t60 [s])
    room_t60 = [(300, 0.45), (1500, 0.34), (5000, 0.25), (12000, 0.14)]
    t = np.arange(SR // 2) / SR
    white = rng.standard_normal((3, len(t)))
    white = white[:2] + 0.22 * white[2]
    tail = np.zeros((2, len(t)))
    for a, b in zip(HALF_OCTAVE_EDGES_HZ[4::2], HALF_OCTAVE_EDGES_HZ[6::2]):
        decay_db = -60 * t / at_hz(room_t60, np.sqrt(a * b))
        tail += band(white, a, b) * voltage_ratio(-3.0 * np.log2(1 + a / 3000) + decay_db)   # duller at the top
    tail = tail * np.minimum(t / 0.0027, 1) / np.sqrt((tail ** 2).sum(1, keepdims=True))
    return signal.fftconvolve(x[None], tail, axes=1)[:, :N]


def scene():
    """The rattle lies off to the left; knocks and pouring are central, glass and jet keep their own width."""
    rattle = ice_rattle()
    glass = band(drops() + clatter(), 140, 22000)
    near = ice_ticks() + wet_knocks() + pouring() + cap_and_spits() + float_taps()
    jet = gas()
    feed = voltage_ratio(-12) * glass.mean(0) + voltage_ratio(-8.0) * near
    feed = feed + voltage_ratio(-5.0) * rattle + voltage_ratio(-13.5) * jet.mean(0)
    # weaker and 9 samples later on the right
    leftward = [voltage_ratio(3.5) * rattle, voltage_ratio(-4.5) * np.roll(rattle, shift=9)]
    return glass + near + jet + leftward + room(feed) + background()


def roll_off(x):
    """The treble ends steeply here."""
    return signal.sosfilt(signal.butter(12, 16610, fs=SR, output="sos"), x)


def record(dry):
    """The very top is cut, then peaks are rounded and stop at full scale."""
    top_cut = signal.cheby2(10, 25, 16100, fs=SR, output="sos")
    rounded = 1.64 * np.tanh(signal.sosfilt(top_cut, dry) / 2)
    finished = np.clip(rounded, -1, 1)
    return roll_off(finished)


dry = scene()
out = record(dry)
unload_wav(out)
```